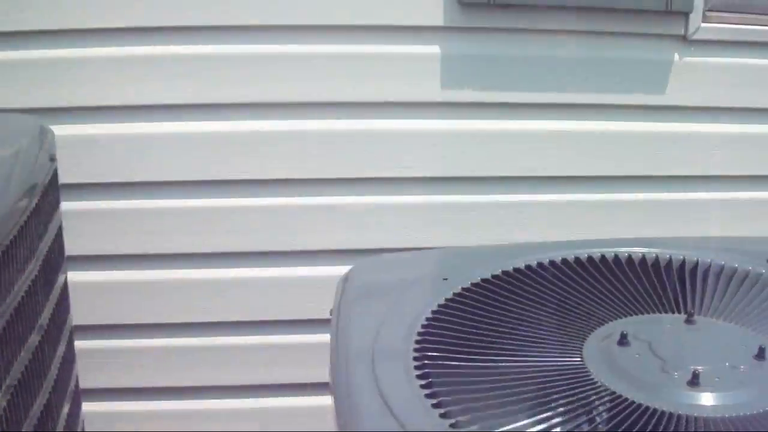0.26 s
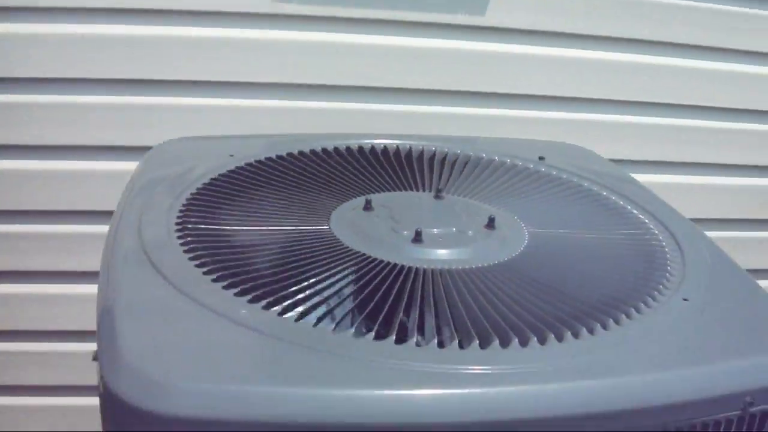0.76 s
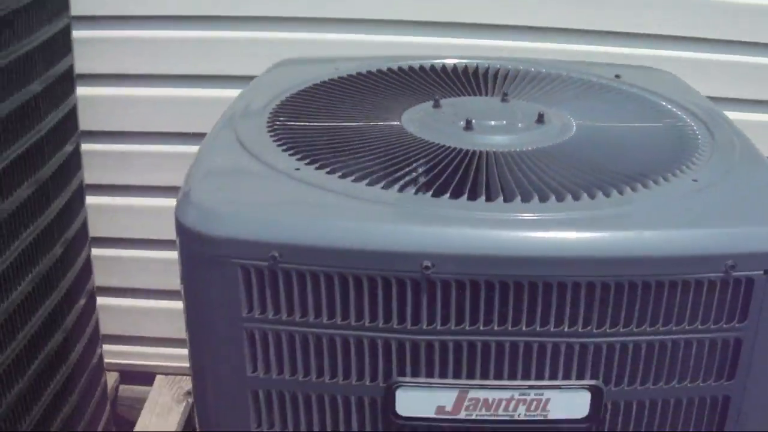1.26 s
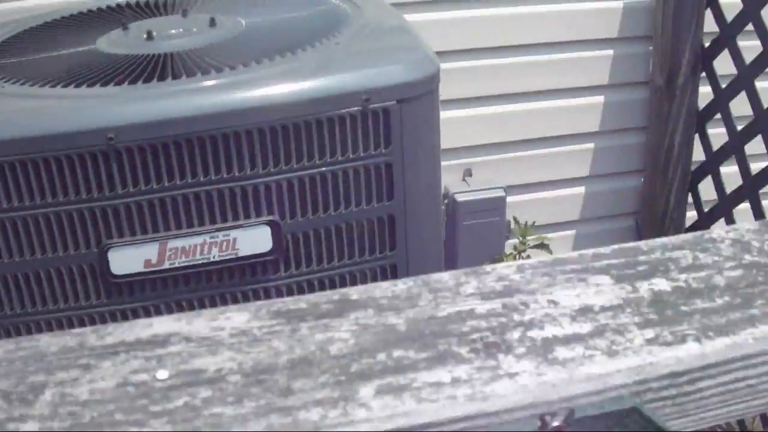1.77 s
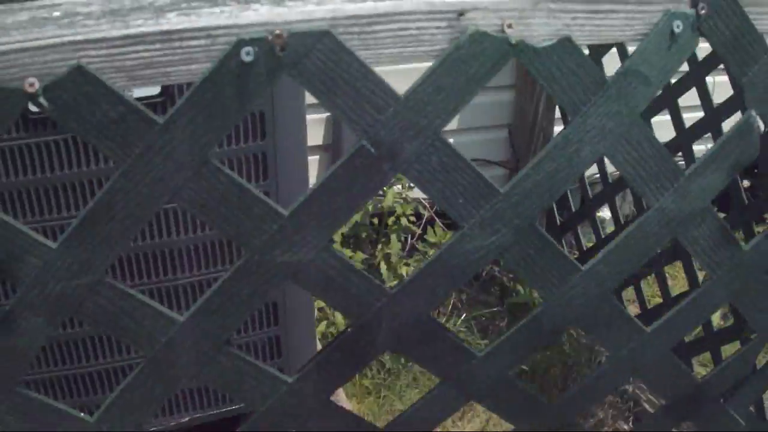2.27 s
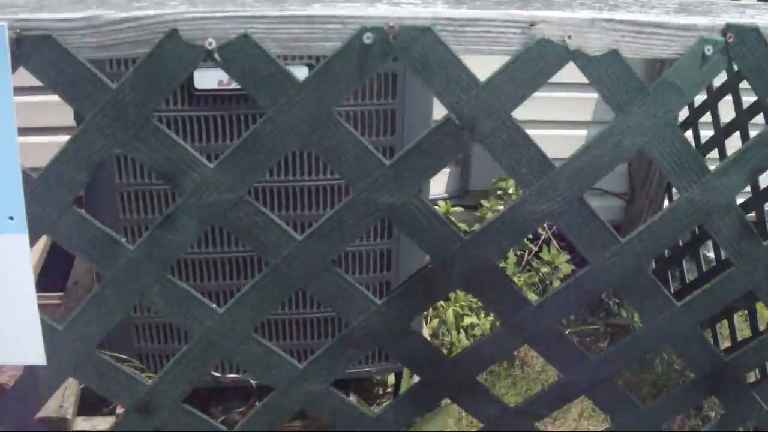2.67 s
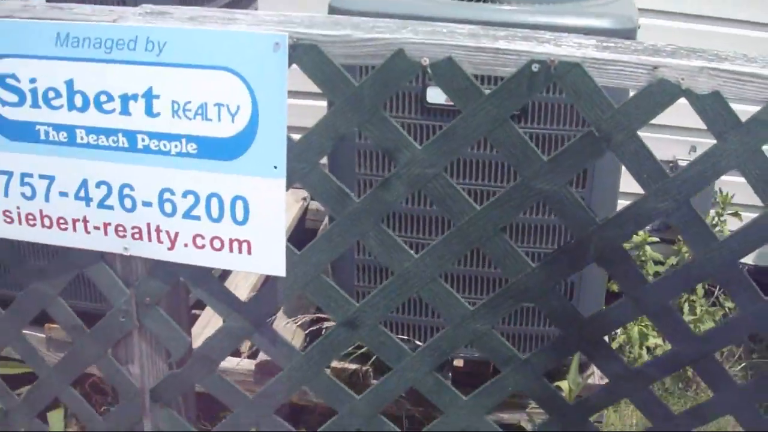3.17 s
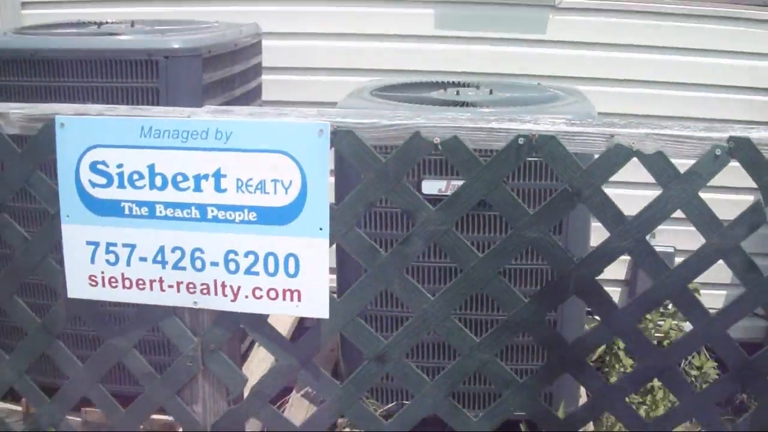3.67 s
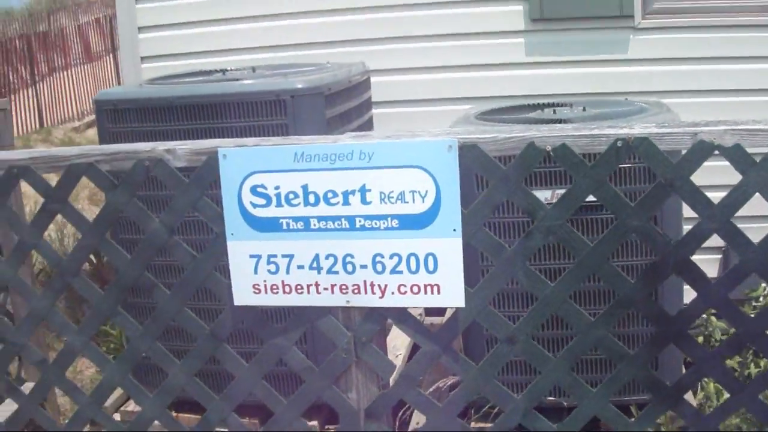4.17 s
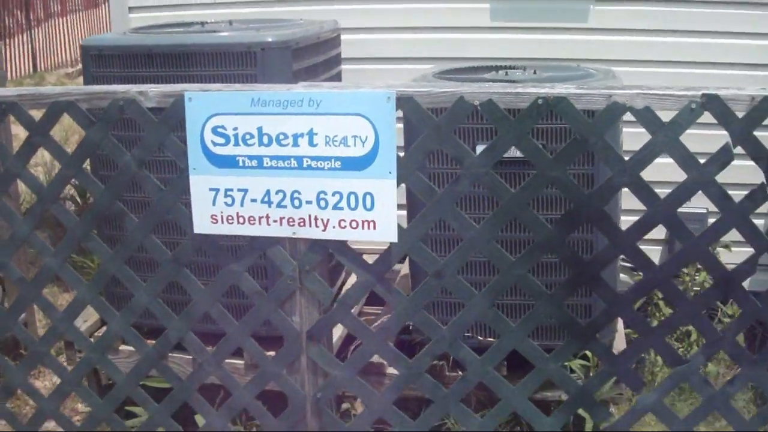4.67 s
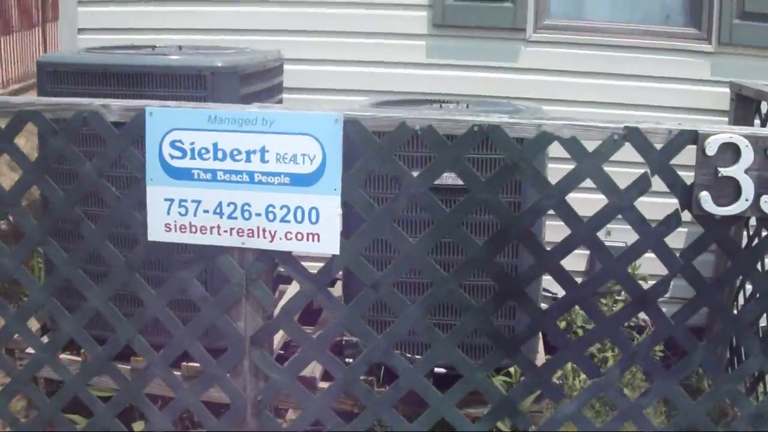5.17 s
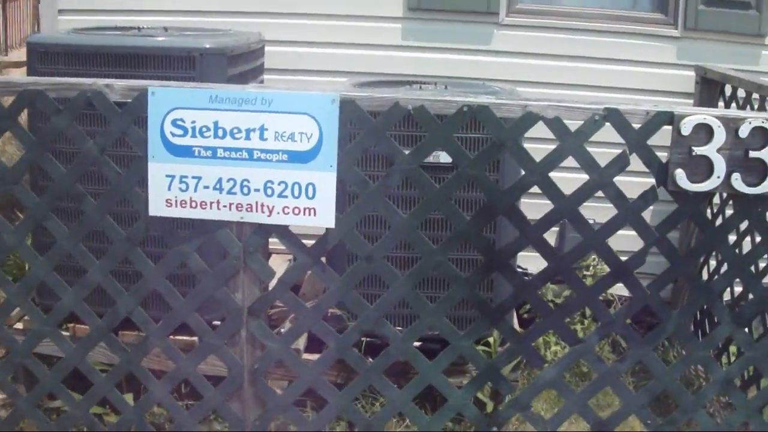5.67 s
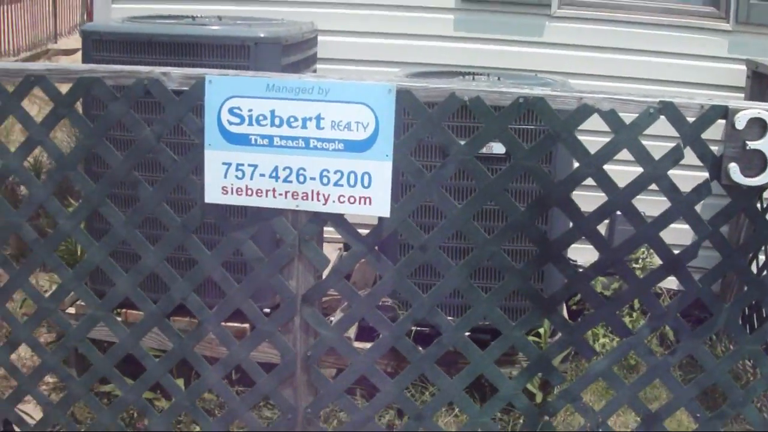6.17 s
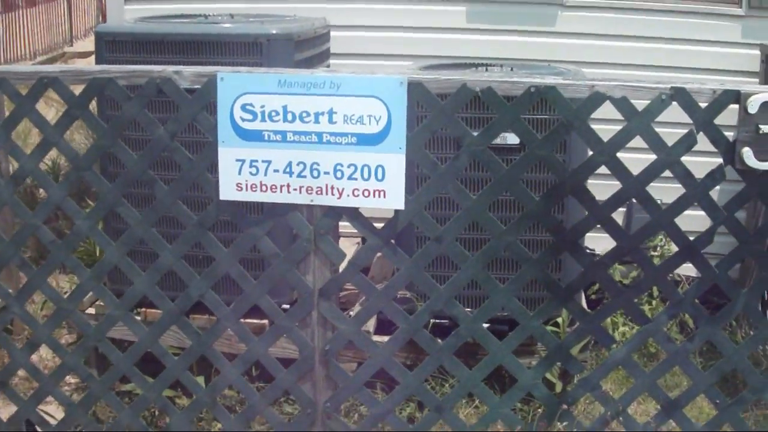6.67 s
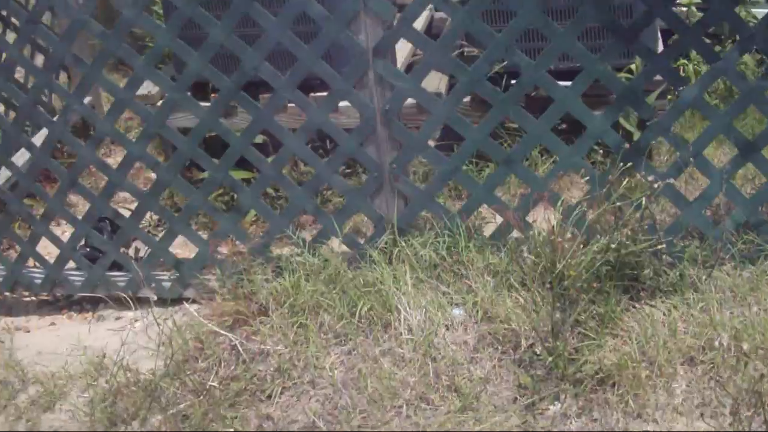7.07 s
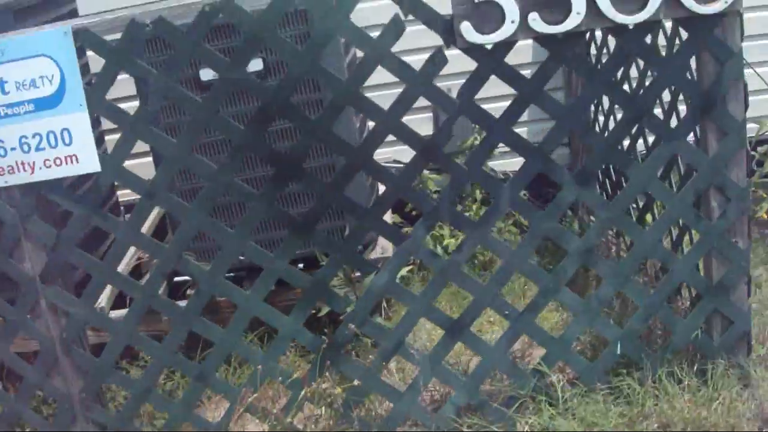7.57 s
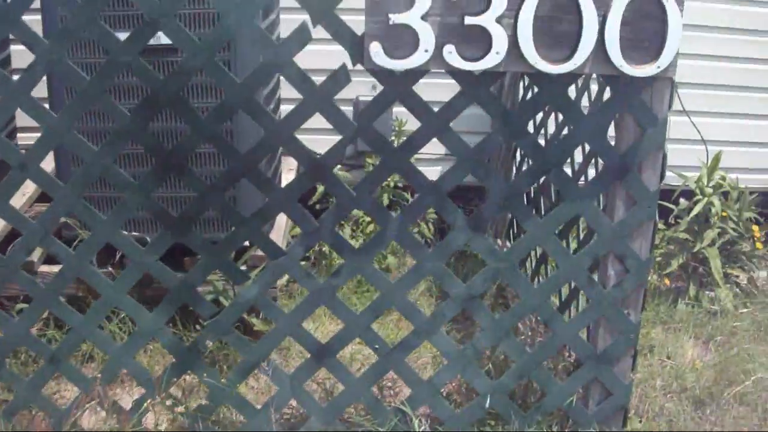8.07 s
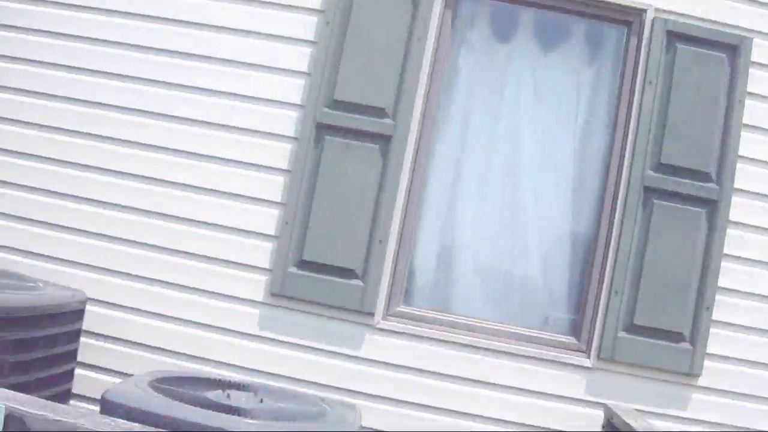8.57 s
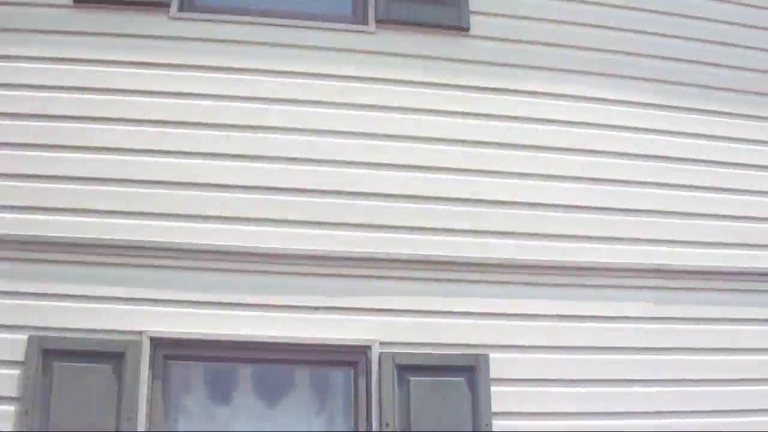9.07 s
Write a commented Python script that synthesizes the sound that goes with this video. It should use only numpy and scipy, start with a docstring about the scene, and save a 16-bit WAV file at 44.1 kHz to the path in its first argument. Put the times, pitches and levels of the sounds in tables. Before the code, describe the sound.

An outdoor heat pump runs beside a house wall, its compressor humming under the steady rush of the fan. The microphone starts close and backs away, so the unit grows softer. A deeper hum, probably a distant engine, swells, wavers and sinks. Light wind rumbles on the microphone, with soft thumps from steps and handling and two plastic clicks. Near the end, dry grass crackles faintly and a far bird chirps.

```python
"""An outdoor heat pump hums beside a house wall: compressor and motor tones under the rush of its fan.
The microphone backs away from the fan grille to behind a lattice fence, and the unit grows softer.
A deeper hum, probably a distant engine, climbs and sinks. Light wind buffets the microphone; steps and
handling bump and rustle, plastic clicks, dry grass crackles and a far bird chirps.
A thin electronic whine and hiss lie under it all."""
import sys
import numpy as np
from scipy import signal
from scipy.fft import rfft, irfft, next_fast_len
from scipy.io import wavfile
from scipy.ndimage import uniform_filter1d

SR = 44100
rng = np.random.default_rng(int(sys.argv[2]) if len(sys.argv) > 2 else 0)


def unload_audio(sound):
    """Save the sound as a 16-bit wav file, at the path given as the first command line argument."""
    columns = np.transpose(np.atleast_2d(sound))
    # keep every value between -1 and 1, then stretch to whole-number steps
    steps = np.round(np.clip(columns, -1, 1) * 32767)
    wavfile.write(sys.argv[1], SR, steps.astype(np.int16))


N = 410571
TIME = np.arange(N) / SR


def compressor():
    """The shaft shakes the casing into a low hum; its higher harmonics ring in the refrigerant pipes."""
    # casing hum: shaft_harmonic, level_db
    casing = [(1, -44.5), (2, -50), (3, -40.5), (5, -55), (6, -57.5), (7, -63), (13, -59.5), (14, -62),
              (15, -64)]
    # pipe ring: shaft_harmonic, level_db
    pipes = [(17, -63), (18, -60), (19, -61.5), (20, -65.5), (21, -80), (22, -63.5), (23, -78), (24, -69),
             (25, -80), (26, -82)]
    shaft = turning(hz=58.905 + 0.0239 * walk(1.967))
    hum = harmonics(shaft, casing, waver_db=1.06, waver_hz=3.71)
    ring = harmonics(shaft, pipes, waver_db=1.3, waver_hz=3.29)
    return hum * reach(0, fall_db=4.36, aside_db=-3.7) + ring * reach(-1.3, fall_db=5.4, aside_db=1.5)


def motors():
    """Magnetic pull makes the motors hum at even multiples of the mains."""
    # magnetic hum: mains_harmonic, level_db
    partials = [(2, -60), (4, -41.5), (8, -62.5)]
    mains = turning(hz=59.9)
    hum = harmonics(mains, partials, waver_db=0.7, waver_hz=3.79)
    return hum * reach(-0.38, fall_db=3.27, aside_db=1.95)


def fan_blades():
    """The blade tones swell and fade slowly, probably beating with the fan of the next unit."""
    # fan tones: blade_harmonic, level_db
    partials = [(1, -43.5), (2, -47.5), (3, -54), (4, -54), (5, -71), (6, -58), (8, -75.5), (9, -68.5)]
    beat_period_s, beat_crest_s, beat_db = 1.57, 0.13, 2
    blade_pass = turning(hz=42.9 + 0.15 * walk(3))
    drone = harmonics(blade_pass, partials, waver_db=-0.8, waver_hz=3.8)
    beat = undb(beat_db * np.cos(2 * np.pi * (TIME - beat_crest_s) / beat_period_s))
    return drone * beat * reach(0.5, fall_db=3.2, aside_db=-6.5)


def fan_rush():
    """Turbulence off the blades flutters slightly; the grille's hiss fades fastest with distance."""
    # low roar: frequency_hz, relative_db
    roar_eq = [(20, 3), (60, 0), (110, -3.5), (165, -1.5), (240, -2.5), (330, -5.5), (450, -5),
               (650, -20.5), (1200, -25.5)]
    # midrange airstream: frequency_hz, relative_db
    stream_eq = [(250, 0), (450, -0.5), (600, 6), (800, 1), (950, -1.5), (1150, -5), (1350, -6.5),
                 (1550, -11.5), (2200, -35), (4000, -52)]
    # grille hiss: frequency_hz, relative_db
    grille_eq = [(1100, -28), (1550, -2), (1850, 0.5), (2200, 2.5), (2550, -4), (2850, -3.5), (3450, -10.5),
                 (4050, -5), (4550, -4.5), (4950, -12.5), (6500, -9.5), (9000, -17.5), (15000, -32)]
    roar = noise(roar_eq) * reach(-42, fall_db=4.2, aside_db=0.28) * undb(0.42 * walk(25))
    stream = noise(stream_eq) * reach(-45, fall_db=4.25, aside_db=0.3) * undb(0.5 * walk(25))
    grille = noise(grille_eq) * reach(-55, fall_db=5.53, aside_db=0) * undb(0.39 * walk(25))
    return ground_dip(roar + stream + grille)


def ground_dip(x):
    """Direct and ground-reflected sound cancel in one band and add above it, more so with distance."""
    # path of the notch: time_s, centre_hz
    sweep = [(0, 390), (2.4, 332), (3.4, 537), (7.2, 496), (8.2, 630), (9.31, 556)]
    far_depth_db, onset_m, width_octaves = 7.5, 0.61, 0.37
    crest_ratio, crest_share = 1.43, 0.34
    hz, s, frames = signal.stft(x, SR, nperseg=1024)
    depth_db = far_depth_db * (1 - (onset_m / np.interp(s, TIME, distance())) ** 2)
    octaves = np.log2((hz[:, None] + 1) / np.interp(s, *np.transpose(sweep)))
    dip = np.exp(-(octaves / width_octaves) ** 2)
    crest = crest_share * np.exp(-((octaves - np.log2(crest_ratio)) / width_octaves) ** 2)
    return signal.istft(frames * undb(depth_db * (crest - dip)), SR)[1][:N]


def distance():
    """Metres from the unit to the microphone, which backs away, then comes a little closer."""
    # the walk: time_s, distance_m
    path = [(.25, 0.65), (.95, 0.76), (2.2, 1.31), (2.8, 1.7), (3.9, 2.1), (5.5, 3.06), (6.9, 3.18),
            (7.8, 2.35), (8.4, 2.47), (9.31, 2.07)]
    return curves(path)[0]


def reach(db, fall_db, aside_db):
    """Gain of one part: db at 2 m, less fall_db per doubling of distance, plus aside_db on a sidestep."""
    sidestep_s, length_s = 7.34, 0.38  # the microphone moves towards the corner of the fence
    aside = np.clip((TIME - sidestep_s) / length_s + 0.5, 0, 1)
    return undb(db - fall_db * np.log2(distance() / 2) + aside_db * aside)


def engine():
    """Only the lowest orders of a far, lumpy engine carry; they boom near the exhaust's resonance."""
    # firing tone: time_s, pitch_hz, level_db
    revs = [(1.2, 93.1, -46), (2.1, 101.3, -46), (2.4, 103.6, -43), (2.7, 108.4, -30), (3.75, 114.6, -27.5),
            (4.5, 116.1, -31), (4.95, 117.4, -37), (5.35, 120.9, -29), (5.6, 123.7, -31.0),
            (5.78, 119.2, -37.5), (6.15, 121.1, -33.0), (6.42, 122.9, -29.5), (6.68, 120.5, -40.0),
            (6.98, 119.7, -33.0), (7.35, 112.5, -43), (7.75, 103.8, -45), (8.6, 106.1, -54),
            (9.2, 109.5, -39)]
    # side tones of uneven firing: cycle_harmonic, level_db
    lumps = [(5, -47.5), (7, -47.5), (11, -49.5), (13, -55.5), (16, -56.5)]
    cylinders, full_load_db = 8, -30
    exhaust_hz, exhaust_width_hz, exhaust_db = 133, 9, 18
    enters_s, fade_s = 0.66, 0.46
    firing_hz, firing_db = curves(revs)
    cycle_hz = firing_hz / cylinders
    cycle = turning(cycle_hz * (1 + 0.0032 * walk(12)))
    out = tone(cylinders * cycle, firing_db + 0.25 * walk(13))
    load_db = 0.26 * (firing_db - full_load_db)  # the side tones partly follow the firing level
    for k, db in lumps:
        boom_db = exhaust_db * np.exp(-((k * cycle_hz - exhaust_hz) / exhaust_width_hz) ** 2)
        out += tone(k * cycle + 2 * np.pi * rng.random(), db + boom_db + load_db + 1.3 * walk(4))
    return out * np.clip((TIME - enters_s) / fade_s, 0, 1)


def wind():
    """A light breeze buffets the microphone with a rumble that rises in gusts."""
    # rumble: frequency_hz, relative_db
    buffet_eq = [(8, 3), (22, -7.5), (45, 4.5), (70, -3.5), (120, -4), (200, -15.5), (400, -40),
                 (1000, -62)]
    # gusts: peak_s, level_db, half_width_s
    gusts = [(0, -44, 0.19), (2.195, -43, 0.59), (3.4, -35.5, 0.76), (4.7, -42, 0.71), (6.4, -48.5, 1.29)]
    breeze_db = -51
    strength = undb(breeze_db) + sum(swell(*gust) for gust in gusts)
    return noise(buffet_eq) * strength * undb(1.8 * walk(10))


def bumps():
    """Steps and handling give soft, low thumps of unsteady pitch."""
    # thumps: peak_s, level_db, pitch_hz, half_width_s
    thumps = [(2.576, -25, 120, 0.022), (3, -21.5, 55, 0.024), (3.372, -21, 55, .016),
              (4.583, -21.5, 70, 0.018), (4.863, -23, 135, 0.0147), (7.515, -23, 50, 0.023)]
    return sum(swell(s, db, width) * np.sin(turning(hz * (1 + 0.14 * walk(90))))
               for s, db, hz, width in thumps)


def clicks():
    """Plastic snaps: a crack of a few milliseconds and a brief ring."""
    # snaps: start_s, level_db, low_knock_db, bright_snap_db
    hits = [(3.007, -44, -10, 13), (3.0164, -16.5, 7, -13.5), (4.1741, -17, -3.5, 2), (4.176, -28, -3, -6)]
    # modes of the plastic: pitch_hz, relative_db, t60_s
    modes = [(626.6, -9.5, 0.012), (1100, -6.5, 0.0092), (1414, -3, 0.0067), (2060, -7.5, 0.014),
             (2540, -0.5, 0.0062), (3870, -5.5, 0.0075), (5560, -5, 0.0047), (6300, -6, 0.011),
             (7260, 0, 0.0075), (9000, -22, 0.0039)]
    out, t = np.zeros(N), TIME[:SR // 10]
    hz, mode_db, t60 = np.transpose(modes)
    rings = np.sin(2 * np.pi * hz[:, None] * t) * undb(-60 * t / t60[:, None])
    rings[1::2] *= -1  # neighbouring modes start in opposite directions
    for s, db, knock_db, snap_db in hits:
        colour_db = np.interp(np.log(hz), np.log([1200, 2500, 6500]), [knock_db, 0, snap_db])
        crack = undb(db - 14) * rng.standard_normal(len(t)) * np.exp(-t / 0.0031)
        start = int(s * SR)
        out[start:start + len(t)] += undb(db + mode_db + colour_db) @ rings + crack
    return signal.sosfilt(signal.butter(2, 11000, fs=SR, output="sos"), out)


def rustles():
    """A hand shifts on the housing in short brushes of noise."""
    # brushes: peak_s, level_db, half_width_s
    brushes = [(0.867, -50, 0.023), (3.117, -53, .03), (3.871, -56, .08)]
    # friction noise: frequency_hz, relative_db
    rustle_eq = [(1500, -4), (2500, 3), (7000, -1), (11000, -4), (15000, -18)]
    return noise(rustle_eq) * sum(swell(*brush) for brush in brushes)


def grass():
    """Dry, stiff stalks crackle and ring briefly underfoot."""
    # faint ticks: start_s, level_db, decay_s
    ticks = [(4.815, -55, .012), (7.49, -47, .015), (7.516, -49, .025), (7.572, -53, .01),
             (8.064, -44.5, .014), (8.866, -44, .014), (9.049, -43.5, 0.011)]
    # stalk resonances: centre_hz, width_hz, relative_db
    stalks = [(6600, 700, -8), (7940, 500, -2), (9780, 130, 3), (9970, 250, 5), (12200, 260, 2)]
    bursts = sum(undb(db) * (TIME > s) * np.exp(-abs(TIME - s) / decay) for s, db, decay in ticks)
    crackle = rng.standard_normal(N) * undb(2.6 * walk(500))
    ring = sum(undb(db) * signal.lfilter(*signal.iirpeak(hz, hz / width, SR), crackle)
               for hz, width, db in stalks)
    return bursts * ring / ring.std()


def bird():
    """A far bird gives short gliding whistles."""
    # whistles: start_s, length_s, start_hz, end_hz, level_db
    chirps = [(7.698, 0.053, 2810, 2750, -58), (7.755, .1, 2100, 2290, -58),
              (7.855, 0.054, 2760, 2800, -61), (7.994, 0.087, 2114, 2600, -61)]
    out = np.zeros(N)
    for s, length, start_hz, end_hz, db in chirps:
        progress = np.clip((TIME - s) / length, 0, 1)
        glide = turning(start_hz + (end_hz - start_hz) * progress)
        out += np.sin(np.pi * progress) * tone(glide, db)
    return out


def electronics():
    """A thin whine of closely spaced lines lies over a smooth hiss; one more swells once a second, for a
    varying time."""
    # steady whine: pitch_hz, level_db
    whine = [(7088.7, -71), (7143, -61), (7197.3, -60.7), (7251.6, -71), (7306, -76), (14890, -61.5)]
    # electronic hiss: frequency_hz, relative_db
    hiss_eq = [(1500, 0.5), (3500, 1), (5500, -1.5), (7300, 4), (8300, -1), (11000, -2), (16000, 2)]
    first_end_s, typical_length_s = 0.27, 0.31
    steady = sum(tone(turning(hz + 0.068 * walk(2.7)), db) for hz, db in whine)
    ends = first_end_s + np.arange(N // SR + 1)
    starts = ends - typical_length_s * np.exp(0.25 * rng.standard_normal(len(ends)))
    gate = sum(1.0 * (TIME > start) * (TIME < end) for start, end in zip(starts, ends))
    pulsing = tone(turning(hz=7445 + 9 * walk(25)), db=-73 + 11 * uniform_filter1d(gate, size=800))
    return steady + pulsing + undb(-54) * noise(hiss_eq)


def harmonics(phase, partials, waver_db, waver_hz):
    """Tones on one rotation; each wavers alone as the wall's reflection adds and cancels."""
    return sum(tone(k * phase + 2 * np.pi * rng.random(), db + waver_db * walk(waver_hz))
               for k, db in partials)


def turning(hz):
    """Running phase at the given rate, from a random start."""
    return 2 * np.pi * (np.cumsum(hz * np.ones(N)) / SR + rng.random())


def tone(phase, db):
    """A sine at an rms level."""
    return np.sqrt(2) * undb(db) * np.sin(phase)


def noise(eq):
    """Noise of rms 1, coloured by an EQ curve and silent beyond its ends."""
    size = next_fast_len(N)
    hz, db = np.transpose(eq)
    bins_hz = np.maximum(np.fft.rfftfreq(size, 1 / SR), 1)
    gain = undb(np.interp(np.log(bins_hz), np.log(hz), db, left=-np.inf, right=-np.inf))
    x = irfft(rfft(rng.standard_normal(size)) * gain, size)[:N]
    return x / x.std()


def walk(hz):
    """Smooth random drift with a spread near 1."""
    hold = int(SR / hz)
    steps = np.repeat(rng.standard_normal(N // hold + 1), hold)
    return 1.303 * uniform_filter1d(uniform_filter1d(steps, hold), hold)[:N]


def swell(peak_s, db, half_width_s):
    """A bell-shaped envelope."""
    return undb(db) * np.exp(-((TIME - peak_s) / half_width_s) ** 2)


def curves(table):
    """The columns of a timed table, one value a sample."""
    s, *columns = np.transpose(table)
    return [np.interp(TIME, s, column) for column in columns]


def undb(db):
    """Decibels to gain."""
    return 10 ** (np.asarray(db) / 20)


def scene():
    """The heat pump and its surroundings, mixed at one microphone."""
    handling = clicks() + rustles()
    heat_pump = compressor() + motors() + fan_blades() + fan_rush()
    return heat_pump + engine() + wind() + bumps() + handling + grass() + bird() + electronics()


def record(dry):
    """The left treble trails the right by one sample; each channel adds its own hiss; the top is cut."""
    # channel hiss: frequency_hz, relative_db
    hiss_eq = [(3000, -30), (4500, 10.5), (7000, 10), (11000, 10), (16000, 2)]
    treble_hz, top_hz = 1500, 15700
    lag = np.append(0, dry[:-1]) - dry
    left = dry + signal.sosfiltfilt(signal.butter(1, treble_hz, "high", fs=SR, output="sos"), lag)
    pair = np.array([left, dry]) + undb(-60.5) * np.array([noise(hiss_eq), noise(hiss_eq)])
    return signal.sosfilt(signal.ellip(10, 0.1, 80, top_hz, fs=SR, output="sos"), pair)


dry = scene()
out = record(dry)
unload_audio(out)
```